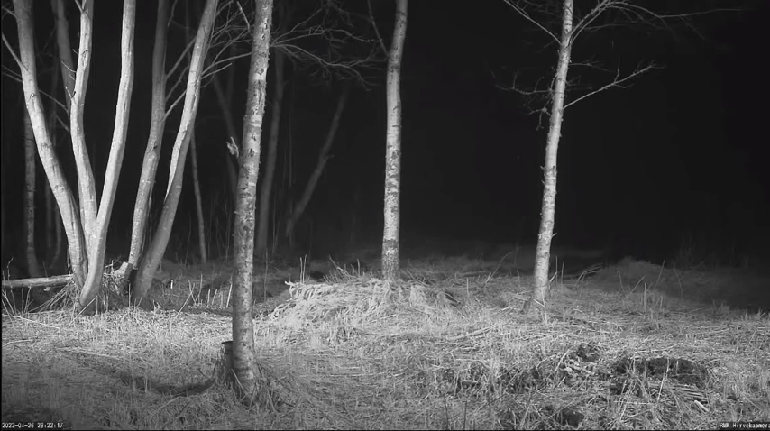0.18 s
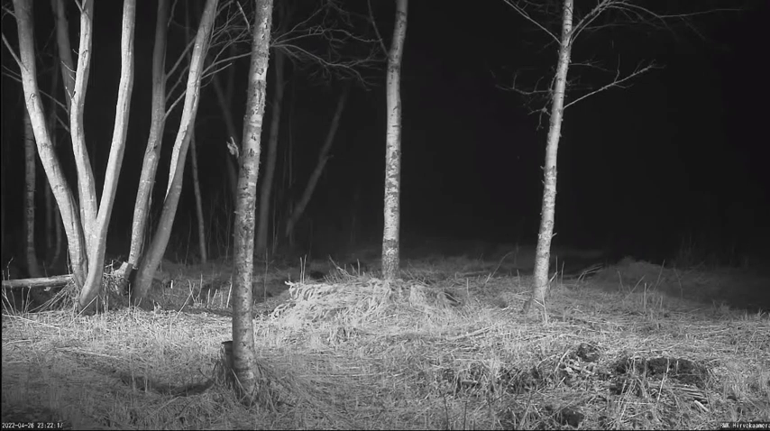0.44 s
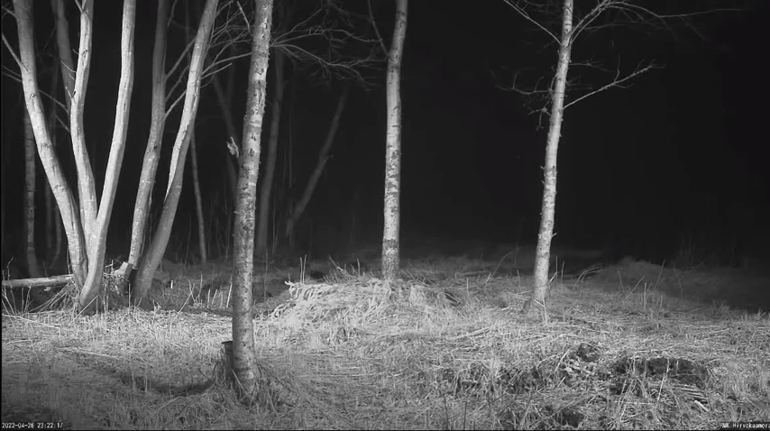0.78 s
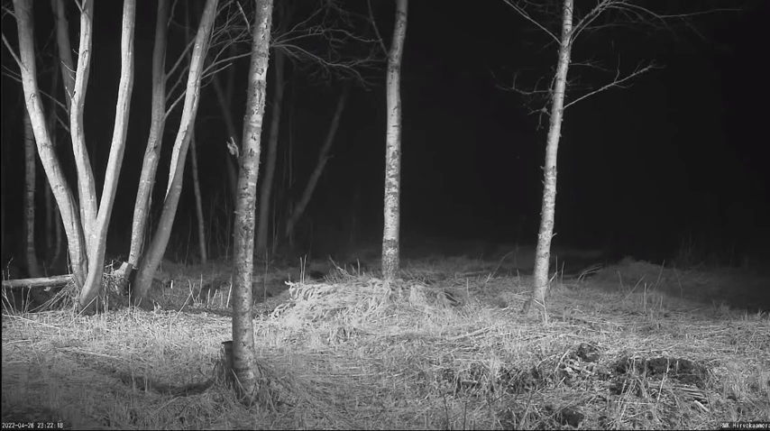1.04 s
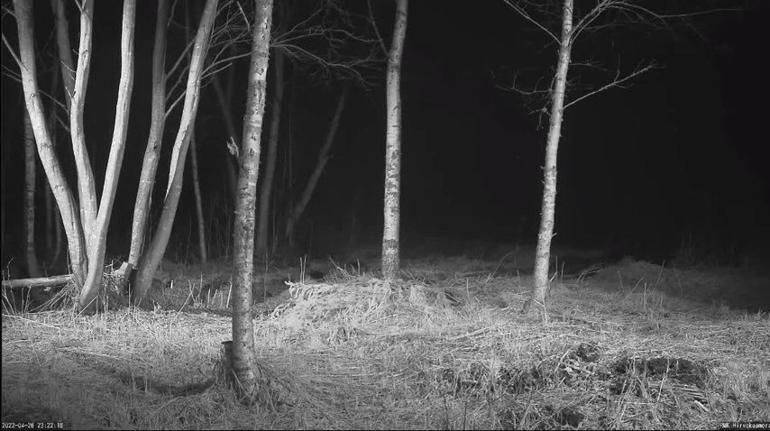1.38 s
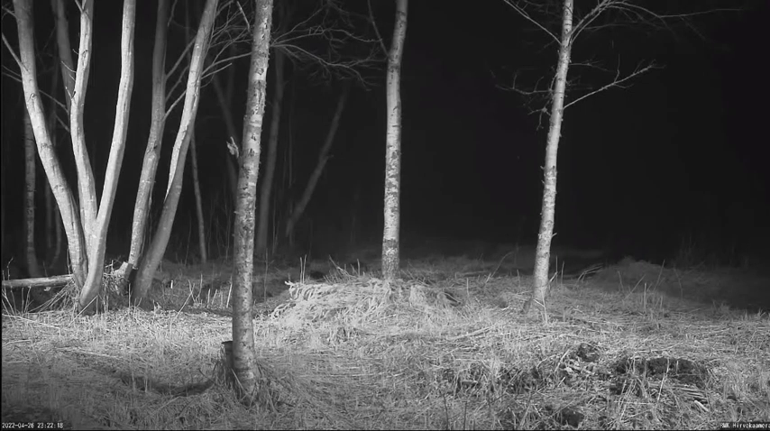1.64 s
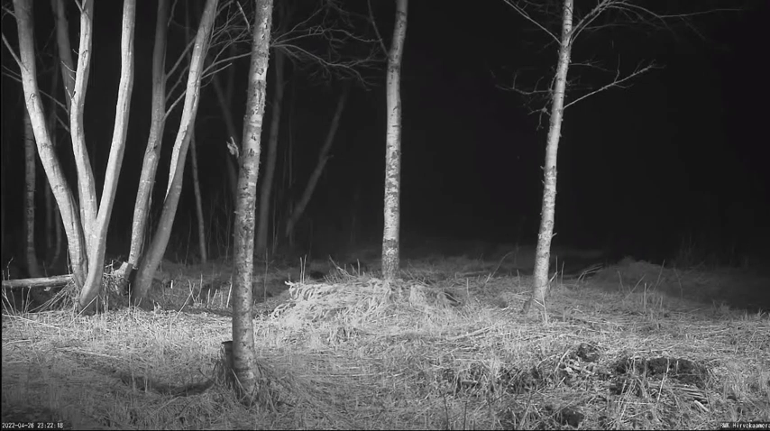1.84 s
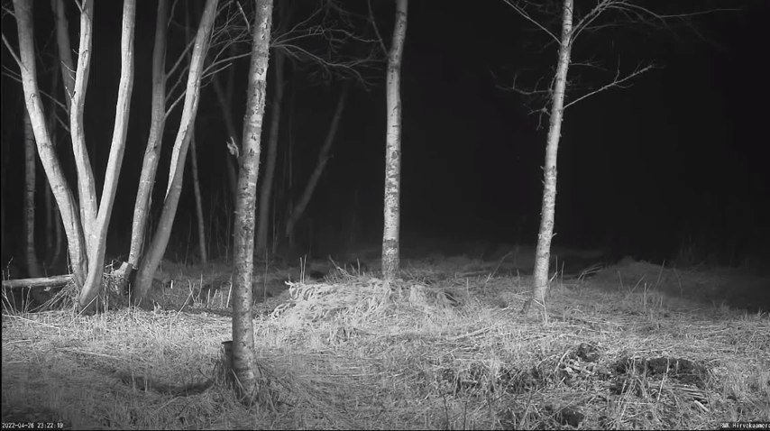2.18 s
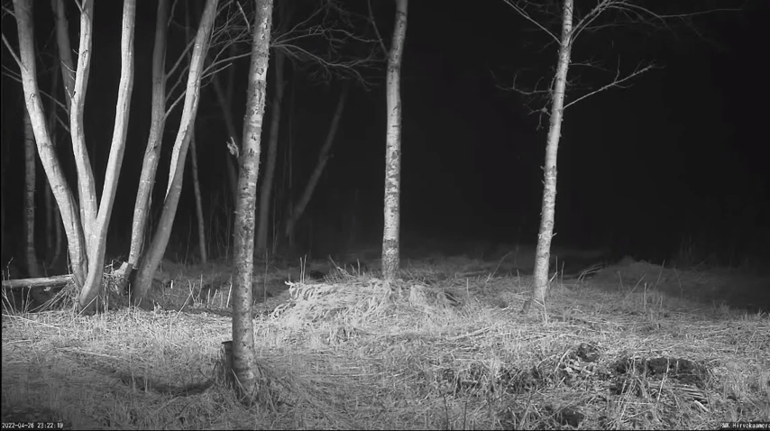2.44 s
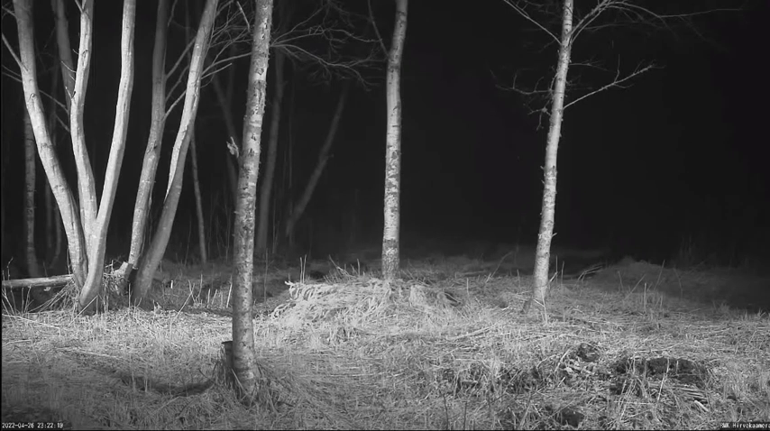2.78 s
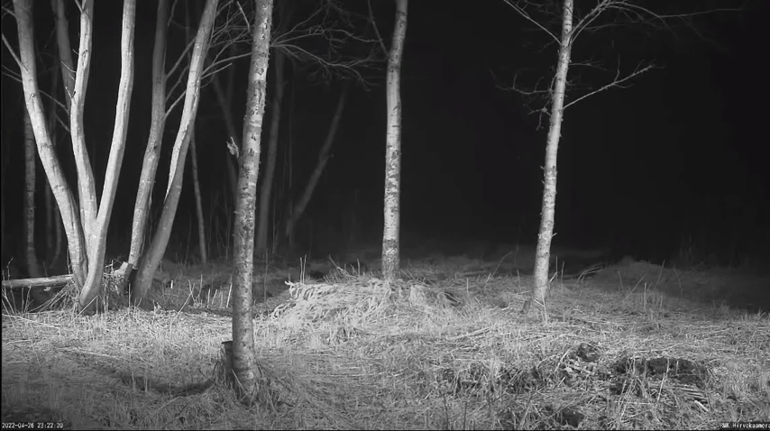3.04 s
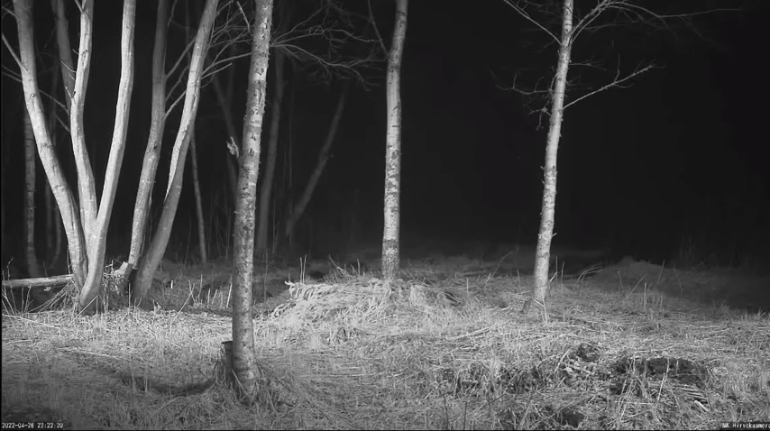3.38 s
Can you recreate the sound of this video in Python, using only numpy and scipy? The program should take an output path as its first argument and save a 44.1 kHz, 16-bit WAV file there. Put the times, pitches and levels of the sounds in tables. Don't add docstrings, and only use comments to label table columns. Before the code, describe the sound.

Wolves call in chorus: a loud stepped-down yelp, then overlapping yips, whines and short howls outdoors

```python
import sys
import numpy as np
from scipy import signal
from scipy.fft import rfft, irfft
from scipy.io import wavfile
from scipy.ndimage import uniform_filter1d

SR = 44100
rng = np.random.default_rng(int(sys.argv[2]) if len(sys.argv) > 2 else 0)


def voltage_ratio(decibels):
    exponent = np.asarray(decibels, float) / 20
    return 10 ** exponent


def to_wav(s):
    ch = np.atleast_2d(s).T
    pcm = np.round(np.clip(ch, -1, 1) * 32767)
    wavfile.write(sys.argv[1], SR, pcm.astype(np.int16))


N = 154350


def read(points, hz):
    f, v = np.transpose(points)
    return np.interp(np.log(hz + 1), np.log(f + 1), v)


def coloured(x, points):
    hz = np.fft.rfftfreq(len(x), 1 / SR)
    return irfft(rfft(x) * voltage_ratio(read(points, hz)), len(x))


def evened(x):
    return x / np.sqrt(np.mean(x ** 2) + 1e-20)


def add(mix, s, sound):
    part = mix[round(s * SR):][:len(sound)]
    part += sound[:len(part)]


# (frequency [Hz], density [dB per Hz])
HISS = [(25, 30.5), (80, 23), (170, 18.5), (300, 21), (1000, 34), (3500, 0.5), (7000, -0.5), (15500, -4.5)]


def hiss():
    hz = np.fft.rfftfreq(N, 1 / SR)
    z = rfft(rng.standard_normal(N)) * voltage_ratio(read(HISS, hz))
    top = irfft(z * (hz > 6500) * (hz < 15000), N)
    return voltage_ratio(-73) * irfft(z, N) / np.std(top)


# (frequency [Hz], time to fall 60 dB [s])
WOOD_DECAY = [(300, 1.4), (1000, 2.04), (2000, 0.66), (4000, 1.4), (8000, 0.28)]


def wood(x):
    first, spacing = 300, 20
    taps = np.zeros(2 * SR)
    at = np.arange(first, 2 * SR - spacing, spacing)
    at = at + rng.integers(0, spacing, len(at))
    taps[at] = rng.choice([-1., 1.], len(at))
    hz, t, z = signal.stft(taps, SR, nperseg=256)
    decay = voltage_ratio(-60 * t / read(WOOD_DECAY, hz)[:, None])
    tail = signal.istft(z * decay, SR, nperseg=256)[1]
    return signal.fftconvolve(x, tail / np.linalg.norm(tail))[:len(x)]


def tree_line(x):
    echo_s, smear_s = 0.3097, 0.02
    t = np.arange(SR // 2) / SR
    taps = rng.standard_normal(len(t)) * np.exp(-((t - echo_s) / smear_s) ** 2)
    return signal.fftconvolve(x, taps / np.linalg.norm(taps))[:len(x)]


# (frequency [Hz], gain [dB])
AIR = [(300, -33), (500, -14.5), (800, -2), (1300, -2.5), (1700, 6.5), (2300, -20), (3200, -43.5),
       (6000, -50.5)]


def voice(hz, over_db, rough, colour=AIR):
    noise = rng.standard_normal((2, len(hz)))
    smooth = [uniform_filter1d(uniform_filter1d(v, size=150), size=150) for v in noise]
    shake, flutter = evened(smooth[0]), evened(smooth[1])
    phase = 2 * np.pi * (np.cumsum(hz * (1 + 0.098 * rough * shake)) / SR + rng.random())
    harmonics_db = [0, *over_db]
    gains = np.array([voltage_ratio(db + read(colour, k * hz)) for k, db in enumerate(harmonics_db, 1)])
    gains /= np.linalg.norm(gains, axis=0)
    tone = sum(g * np.sin(k * phase) for k, g in enumerate(gains, 1))
    return (1 + rough * flutter) * np.sqrt(2) * tone


def swell(t, rise_s, fall_s):
    return np.clip(np.minimum(t / rise_s, (t[-1] - t) / fall_s), 0, 1) ** 1.4


def held(curve, over_db, rise_s, colour=AIR):
    s, hz, db = np.transpose(curve)
    t = np.arange(s[0], s[-1], 1 / SR)
    smooth = uniform_filter1d(np.interp(t, s, hz), size=400, mode="nearest")
    level = swell(t - s[0], rise_s, 0.02) * voltage_ratio(np.interp(t, s, db))
    return s[0], level * voice(smooth, over_db, 0.032, colour)


YIP_OVER_DB = [0, 0, 0, 0, 0, 0]
# (frequency [Hz], gain [dB])
MOUTH = [(450, -22), (650, -8.5), (950, 2), (1400, 4), (1800, 0.5), (2300, -11.5), (2800, -40.5),
         (4500, -49)]


def yip(start, length, top_s, top_hz, db, sag_s=.12, over_db=YIP_OVER_DB, rough=.06, colour=MOUTH):
    t = np.arange(0, length, 1 / SR)
    from_top = np.maximum(t - top_s, 1.5 * (top_s - t))
    hz = top_hz / (1 + (from_top / sag_s) ** 2.4)
    return start, voltage_ratio(db) * swell(t, 0.028, 0.047) * voice(hz, over_db, rough, colour)


WHINE_OVER_DB = [-6, -3, -4.5]


def whine(start, length, hz, end_hz, db, over_db=WHINE_OVER_DB):
    t = np.arange(0, length, 1 / SR)
    glide = hz + (end_hz - hz) * t / length
    return start, voltage_ratio(db) * swell(t, 0.02, 0.072) * voice(glide, over_db, 0.0824)


# (frequency [Hz], gain [dB])
FAR_MOUTH = [(300, -46), (450, -19), (700, -12), (1000, -3.5), (1400, 0.5), (1900, -7), (2500, -35.5),
             (3500, -40.5)]


def far_pack():
    calls, low_hz, high_hz, spread_db = 170, 400, 800, 5
    mix = np.zeros(N + SR)
    for k, (when, size, top, pitch, loud) in enumerate(rng.random((calls, 5))):
        start = (k + when) / calls * len(mix) / SR
        length = 0.062 + .15 * size ** 3
        hz = low_hz * (high_hz / low_hz) ** pitch
        call = yip(start, length, top * length * .6, hz, spread_db * loud,
                   sag_s=1.1 * length, rough=0.15, colour=FAR_MOUTH)
        add(mix, *call)
    return mix


# (time [s], level [dB])
CHORUS = [(0, -40), (0.401, -41.5), (0.699, -32.5), (1.1, -30), (1.301, -32), (1.6, -34), (2.0, -36.5),
          (2.499, -36.5), (2.9, -35.5), (3.2, -37.5), (3.5, -39)]


def far_chorus():
    far = far_pack()
    heard = (far + wood(far))[SR:]
    return evened(heard) * voltage_ratio(np.interp(np.arange(N) / SR, *np.transpose(CHORUS)))


# (start [s], length [s], top after [s], top pitch [Hz], level [dB])
WHISTLES = [(0.127, 0.16, 0.0114, 5620, -68), (0.22, 0.24, 0.032, 6050, -78.5),
            (0.889, 0.12, 0.037, 5900, -68.5), (0.988, .08, 0.029, 4960, -70.5),
            (1.09, 0.13, 0.026, 3970, -73), (1.237, 0.072, 0.028, 3540, -67),
            (2.717, 0.093, 0.024, 5713, -74), (2.502, 0.027, 0.038, 3840, -52),
            (2.542, 0.064, .02, 3030, -60.5), (2.65, 0.11, 0.011, 3051, -67), (1.63, 0.059, .03, 4250, -70),
            (1.715, 0.065, 0.018, 3680, -72.5), (1.734, 0.066, 0.023, 4600, -76),
            (1.83, 0.049, 0.027, 4420, -69), (1.94, 0.066, 0.051, 4150, -68.5),
            (2.89, 0.18, 0.17, 4350, -73.5)]
WHISTLE_SAG_S = [.6, .4, .15, .6, .25, .5, .5, .3, .3, .3, .4, .4, .4, .4, .4, .8]


def nose_whistles(mix):
    for row, sag_s in zip(WHISTLES, WHISTLE_SAG_S):
        add(mix, *yip(*row, sag_s=sag_s, over_db=[], rough=0.069))


# (start [s], length [s], pitch [Hz], end pitch [Hz], level [dB])
MOANS = [(.675, .085, 650, 650, -36.5), (1.2, .17, 335, 324.3, -60), (1.355, 0.078, 650, 615, -35.5),
         (1.43, .1, 405, 454, -47.5), (1.8, .1, 640, 610, -47), (2.35, 0.12, 476, 510, -47.5),
         (2.55, 0.19, 480, 470, -51), (2.975, 0.11, 820, 860, -36), (3.28, 0.074, 890, 870, -36.5),
         (2.755, 0.079, 740, 910, -31), (1.16, .1, 840, 760, -34.5), (3.34, 0.089, 1600, 1200, -38),
         (3.45, 0.062, 1300, 1800, -33), (.85, 0.071, 680, 661, -40.5)]


def moans(mix):
    for row in MOANS:
        add(mix, *whine(*row, over_db=[]))


# (start [s], length [s], pitch [Hz], end pitch [Hz], level [dB])
WHINES = [(0.141, .09, 1640, 1600, -36), (0.73, 0.099, 1000, 1110, -24.5), (1.11, 0.06, 1500, 1400, -19.5),
          (0.85, 0.33, 640, 630, -53), (1.38, 0.26, 880, 610, -41.5), (2.85, 0.25, 660, 760, -45),
          (1.8, 0.063, 1900, 1330, -27.5), (1.8, 0.13, 1100, 1700, -40), (2.1, 0.085, 1100, 1100, -38),
          (1.6, 0.12, 1390, 1200, -46.5), (3.4, 0.13, 1900, 1000, -34), (2.7, 0.1967, 840, 1200, -42),
          (3.282, 0.15, 1420, 1400, -45.5)]


def whines(mix):
    for row in WHINES:
        add(mix, *whine(*row))


# (start [s], length [s], top after [s], top pitch [Hz], level [dB])
YIPS = [(0.029, 0.12, .045, 567, -40), (.56, 0.067, 0.0333, 499.7, -24.5),
        (0.671, 0.092, 0.014, 642.4, -32.5), (0.889, 0.08, 0.016, 504.4, -29),
        (1.345, 0.055, 0.019, 652, -33), (1.662, 0.12, 0.052, 469.1, -30),
        (1.933, 0.057, 0.047, 536.6, -32), (2.028, 0.12, 0.0294, 797.3, -37),
        (2.257, 0.087, .005, 844.4, -31.5), (2.352, 0.11, .04, 503.8, -30.5),
        (2.49, 0.094, .052, 533.8, -27.5), (2.61, 0.13, .06, 515.3, -37), (2.743, 0.098, .035, 954, -35),
        (2.983, 0.062, 0.04, 738, -37), (3.201, 0.047, 0.017, 692, -39.5), (3.447, 0.061, 0.03, 489, -39.5),
        (1.097, 0.074, .03, 432, -26.5), (1.198, 0.094, .03, 697.5, -29), (1.8, 0.091, 0.0344, 584, -42)]


def yips(mix):
    for row in YIPS:
        add(mix, *yip(*row))


HIGH_OVER_DB = [-0.5, -3]
# (time [s], pitch [Hz], level [dB])
CRY = [
    (2.737, 1480, -30),
    (2.756, 1370, -28),
    (2.802, 1350, -30.5),
    (2.83, 1350, -35),
    (2.876, 1370, -29),
]
# (time [s], pitch [Hz], level [dB])
FLAT = [
    (2.98, 1764, -31.5),
    (3.02, 1785, -34.5),
    (3.05, 1735, -29),
    (3.085, 1477, -34),
]
# (time [s], pitch [Hz], level [dB])
FALL = [
    (0.931, 1604, -24.5),
    (0.982, 1530, -25),
    (1.0, 1324, -19),
    (1.021, 1136, -24.5),
    (1.032, 961, -31.5),
    (1.045, 895, -37.5),
]
# (time [s], pitch [Hz], level [dB])
ARCH = [
    (2.868, 964.5, -36),
    (2.886, 1302, -27),
    (2.911, 1434, -20),
    (2.934, 1445, -16.5),
    (2.96, 1330, -24.5),
    (2.997, 1005, -26.5),
]
# (time [s], pitch [Hz], level [dB])
DROOPS = [
    [(1.018, 1877, -27), (1.055, 1763, -26.5), (1.095, 1480, -31.5)],
    [(1.165, 1606, -31), (1.19, 1665, -26), (1.22, 1518, -29.5), (1.258, 1345, -34.5)],
]


def high_cries(mix):
    for curve in CRY, FLAT:
        add(mix, *held(curve, HIGH_OVER_DB, .005))
    for curve in FALL, ARCH, *DROOPS:
        add(mix, *held(curve, HIGH_OVER_DB, .012))


# (time [s], pitch [Hz], level [dB])
HOWL = [
    (2.1, 1138, -43),
    (2.14, 1064, -38),
    (2.18, 1088, -30),
    (2.23, 1119, -31),
    (2.27, 1079, -36.5),
    (2.31, 1085, -38.5),
    (2.4, 1040, -44),
]
HOWL_OVER_DB = [5.5, -1, -0.5]


def held_howl(mix):
    add(mix, *held(HOWL, HOWL_OVER_DB, 0.027))


# (time [s], pitch [Hz], level [dB])
YELP = [
    (.232, 1543, -21),
    (.305, 1495, -22),
    (.335, 1261, -16.5),
    (.385, 1207, -20.5),
    (.425, 1133, -20.5),
    (.52, 1106, -26.5),
    (.56, 904, -34),
    (.62, 873, -36.5),
    (.66, 820, -29),
]
YELP_OVER_DB = [0, -17, -15]
# (frequency [Hz], gain [dB])
YELP_THROAT = [(880, -17), (1150, 4), (1520, 5), (1760, -16), (2250, -19), (3050, -34.5), (3400, -41),
               (6000, -40)]


def stepped_yelp(mix):
    add(mix, *held(YELP, YELP_OVER_DB, .006, YELP_THROAT))


# (frequency [Hz], gain [dB])
TURNED = [(1900, 0.5), (2400, -4.5), (3000, -20.5), (5000, -21.5)]
# (frequency [Hz], gain [dB])
SCATTER = [(400, 3), (1500, -0.5), (3000, 5.5), (5000, 5.5)]


def near_pack():
    facing, aside = np.zeros((2, N))
    for call in nose_whistles, held_howl, stepped_yelp:
        call(facing)
    for call in moans, whines, yips, high_cries:
        call(aside)
    turned = coloured(aside, TURNED)
    tail = wood(coloured(facing + aside, SCATTER))
    echo = tree_line(coloured(facing, SCATTER) + turned)
    return facing + turned + voltage_ratio(-8) * tail + voltage_ratio(-16) * echo


def scene():
    return (hiss() + far_chorus() + near_pack())[None]


def top_cut(x):
    return signal.sosfilt(signal.butter(12, 15730, fs=SR, output="sos"), x)


def record(dry):
    return top_cut(dry)


dry = scene()
out = record(dry)
to_wav(out)
```